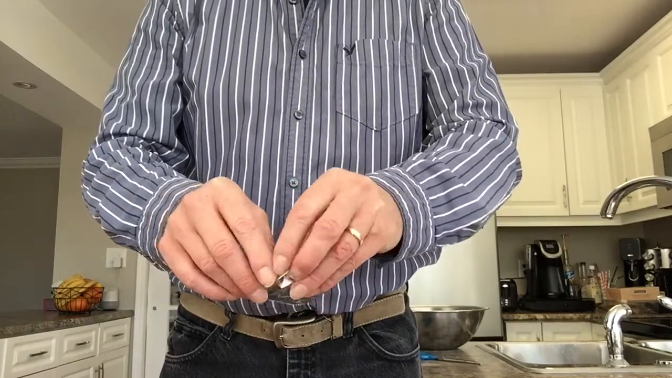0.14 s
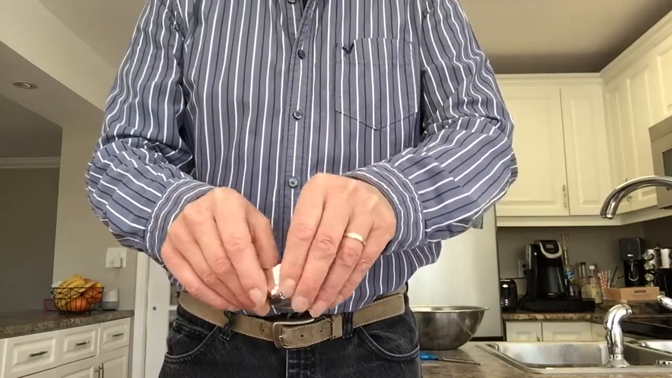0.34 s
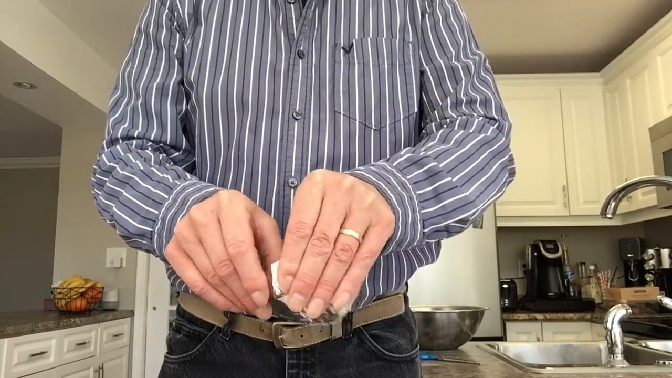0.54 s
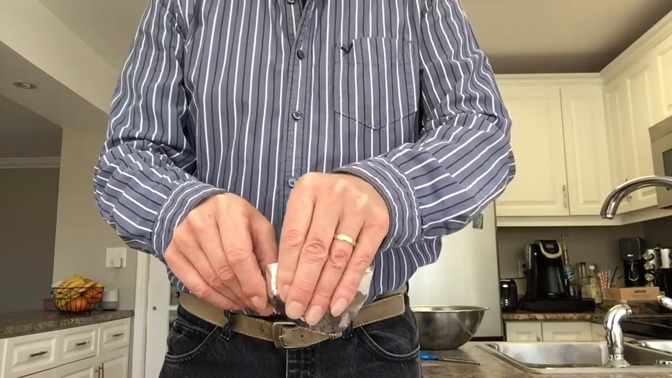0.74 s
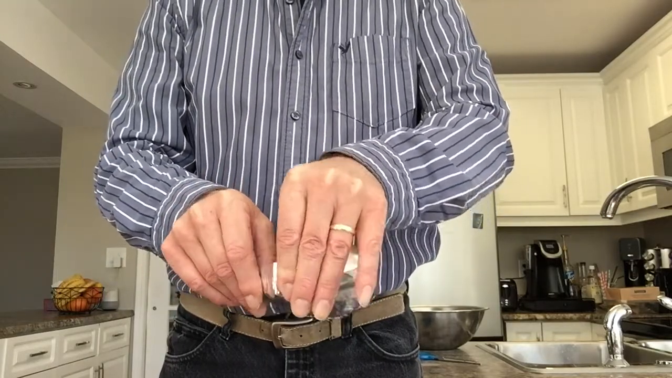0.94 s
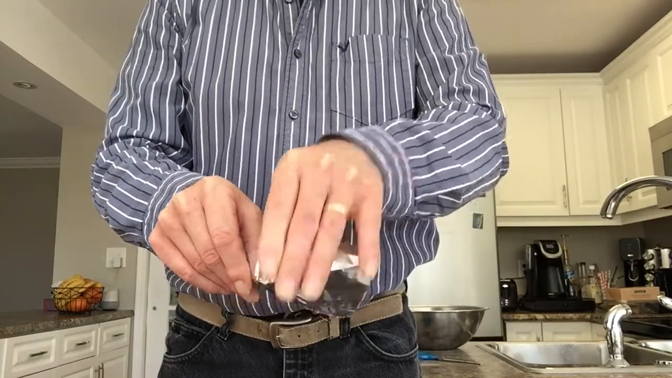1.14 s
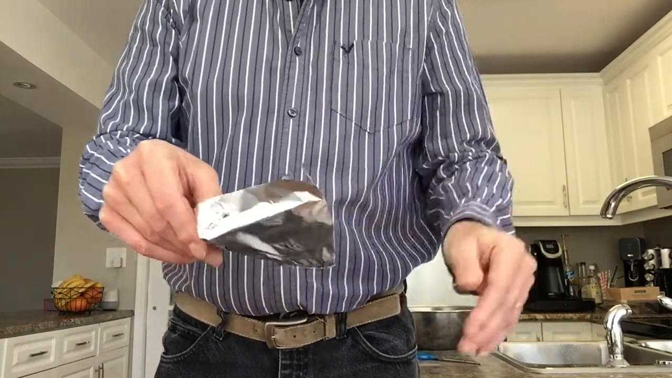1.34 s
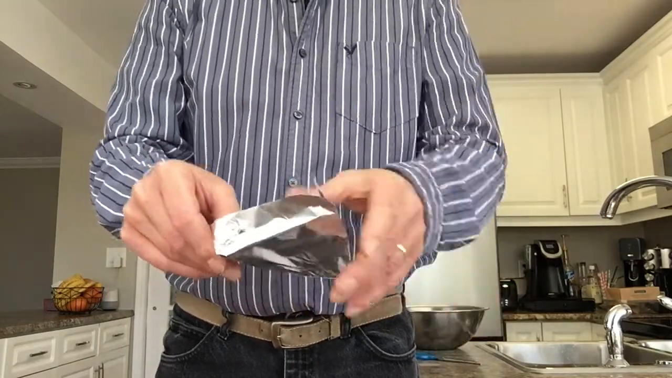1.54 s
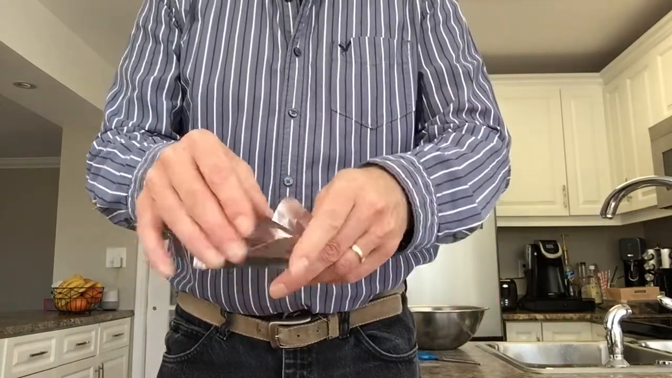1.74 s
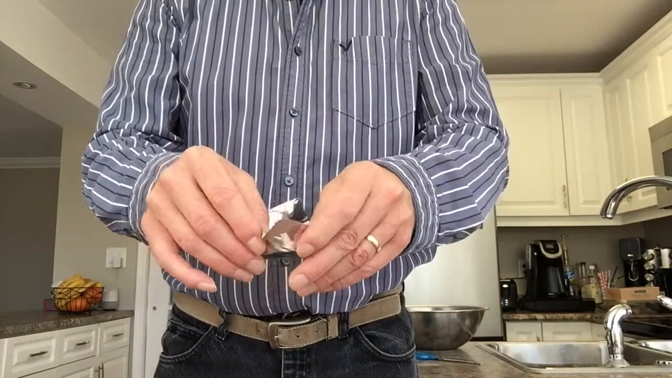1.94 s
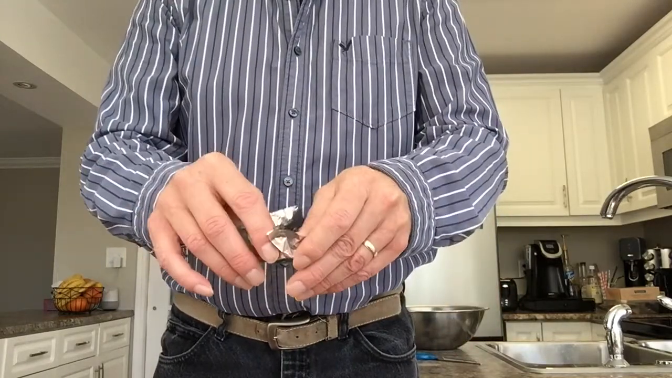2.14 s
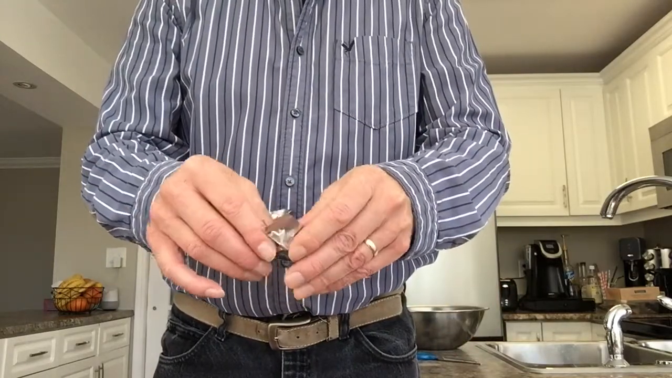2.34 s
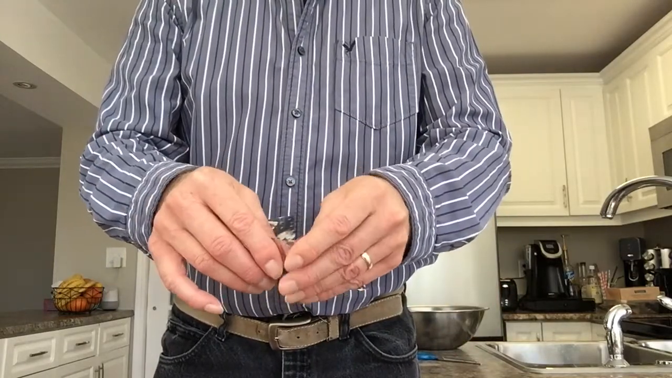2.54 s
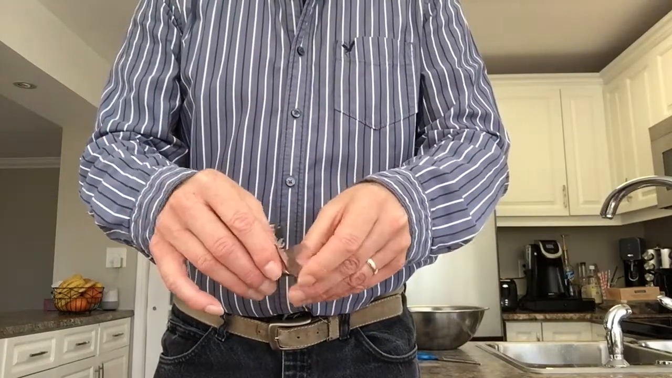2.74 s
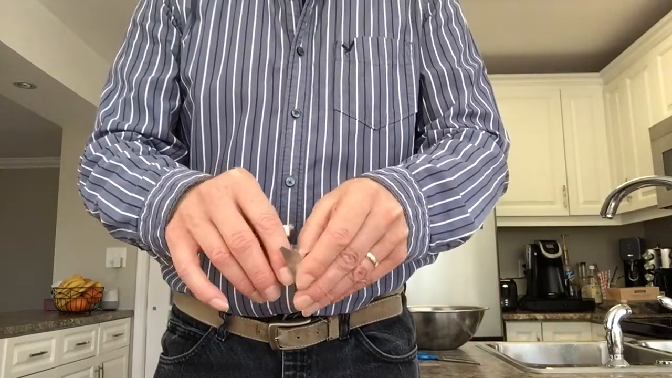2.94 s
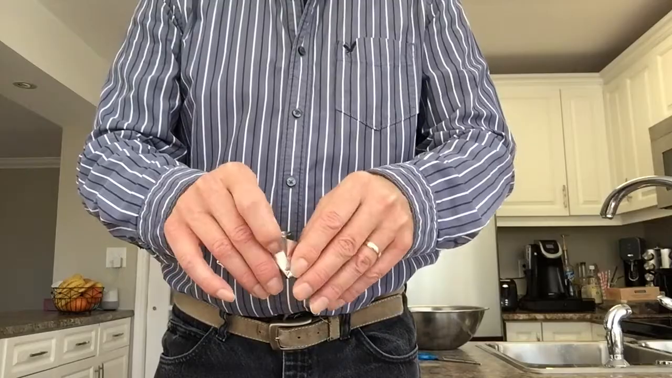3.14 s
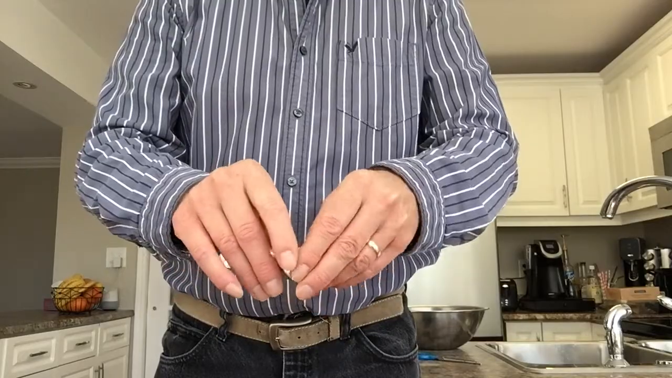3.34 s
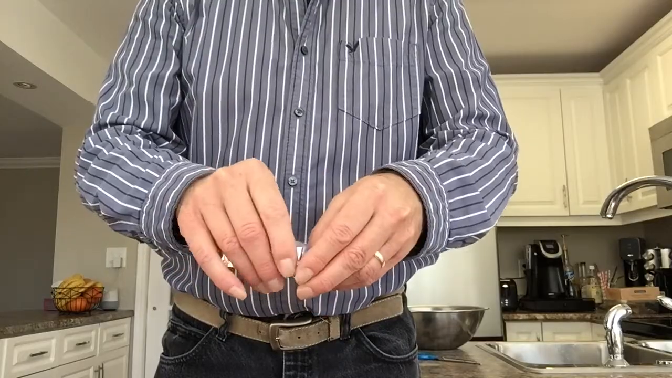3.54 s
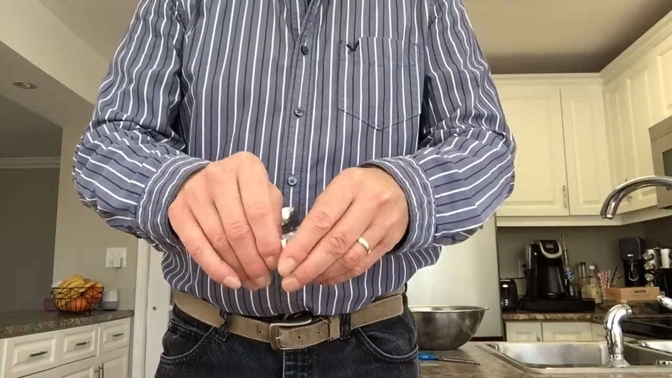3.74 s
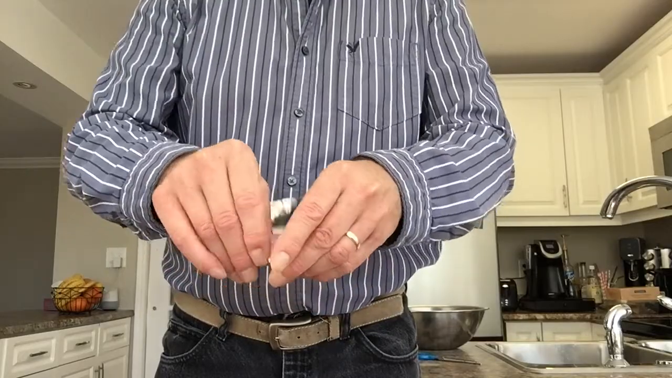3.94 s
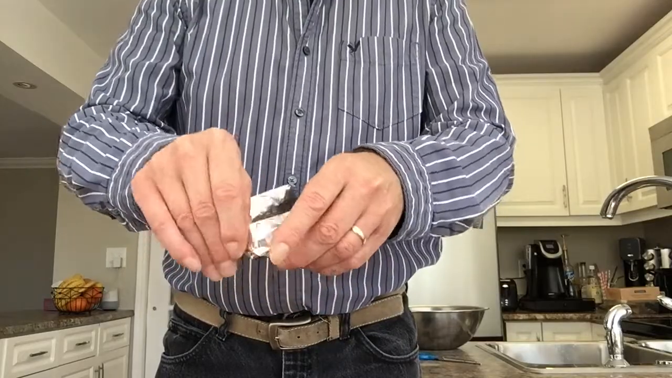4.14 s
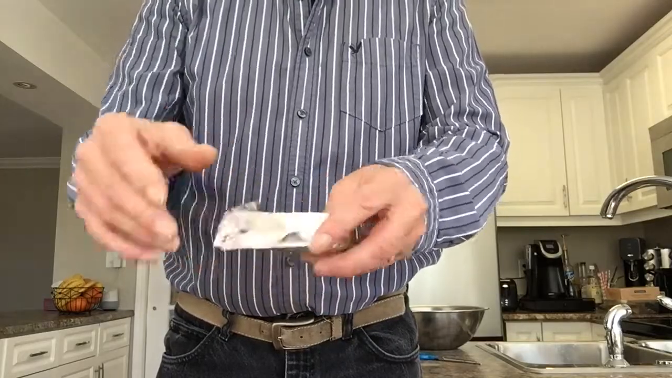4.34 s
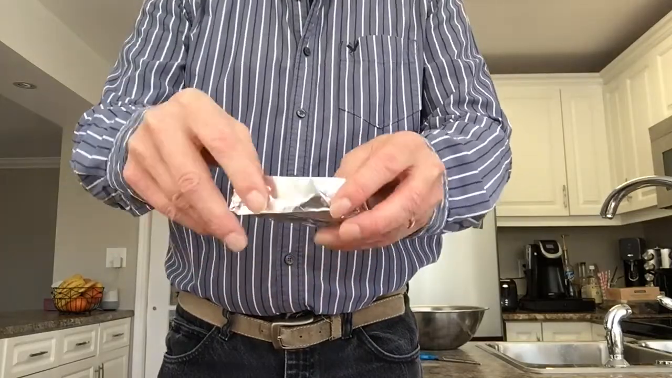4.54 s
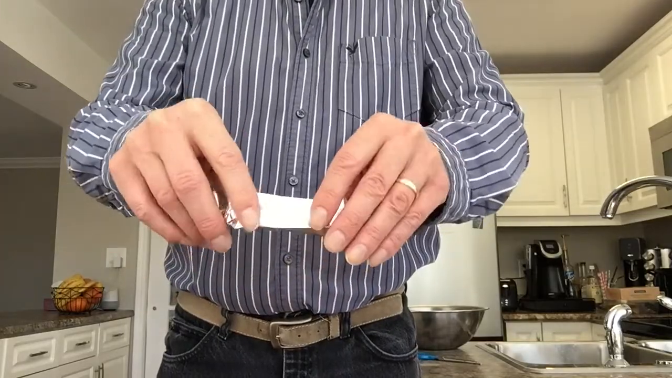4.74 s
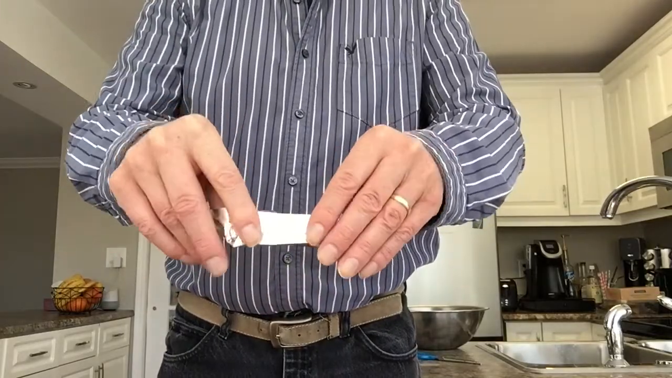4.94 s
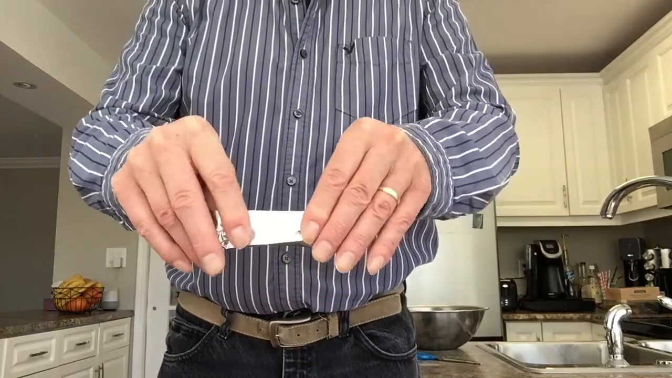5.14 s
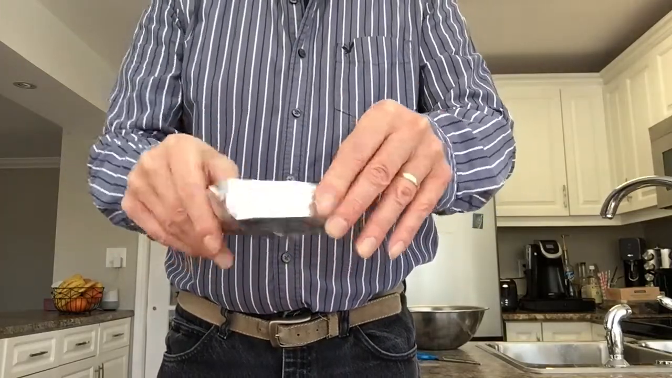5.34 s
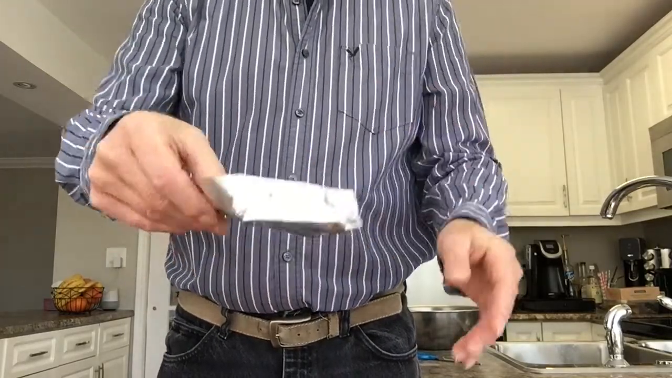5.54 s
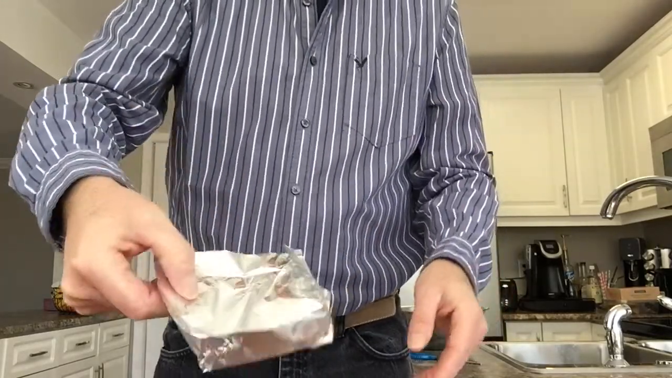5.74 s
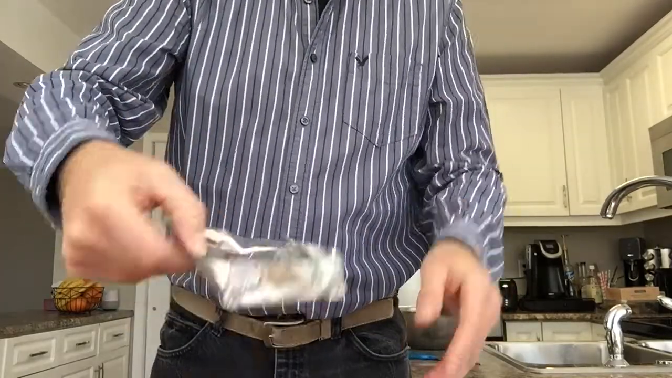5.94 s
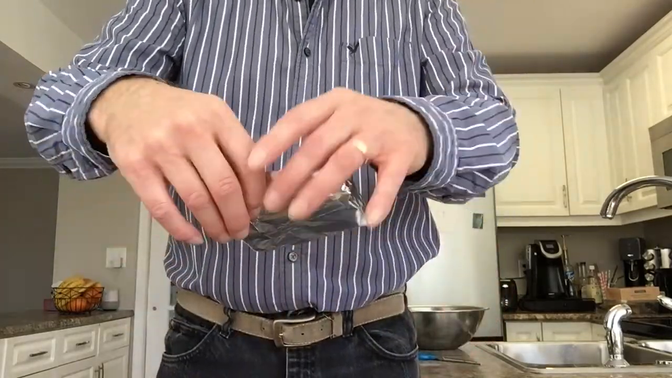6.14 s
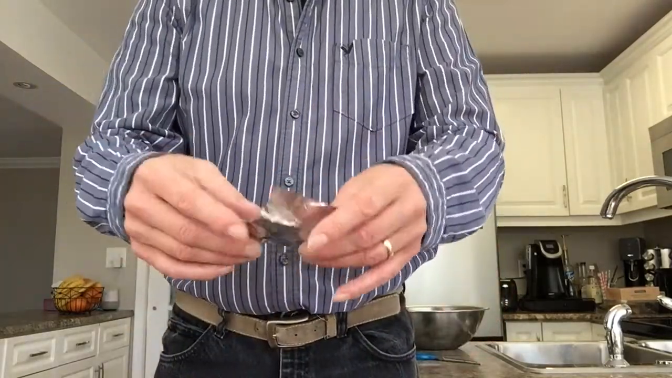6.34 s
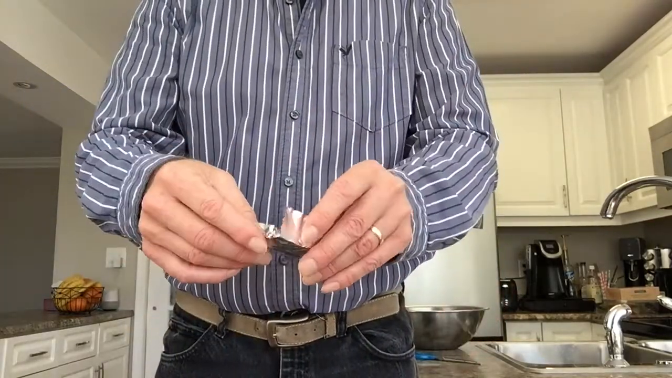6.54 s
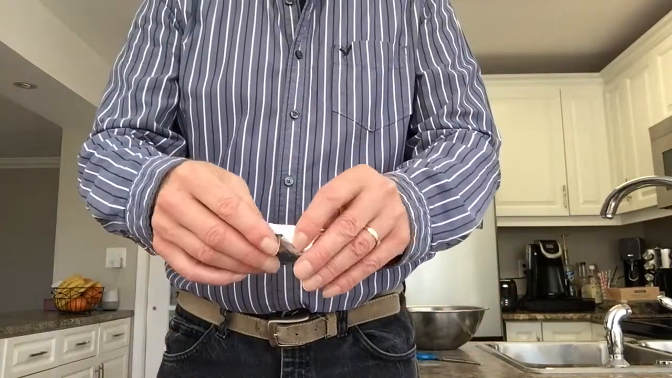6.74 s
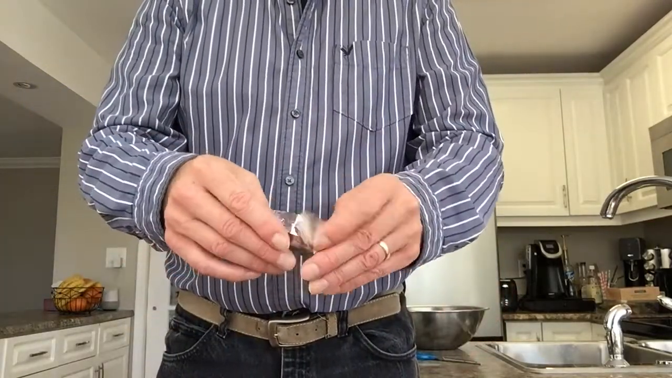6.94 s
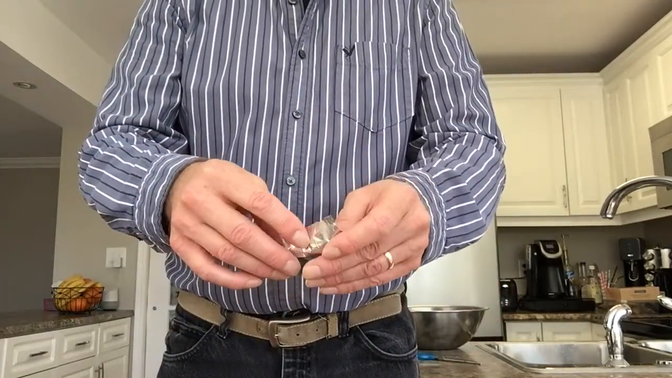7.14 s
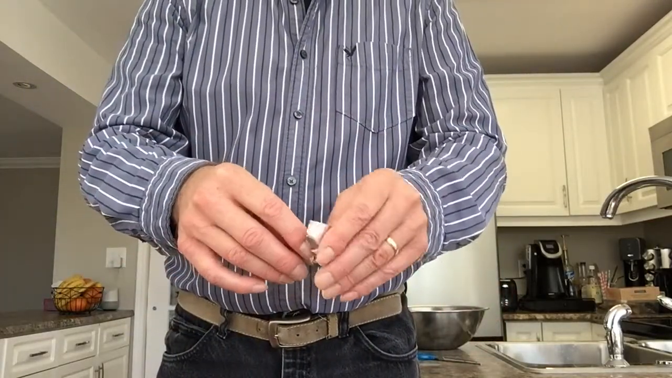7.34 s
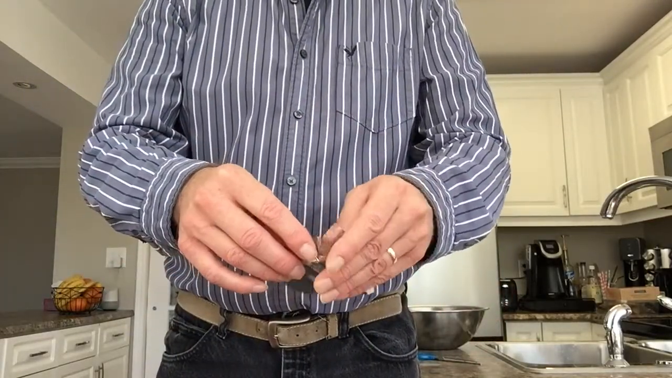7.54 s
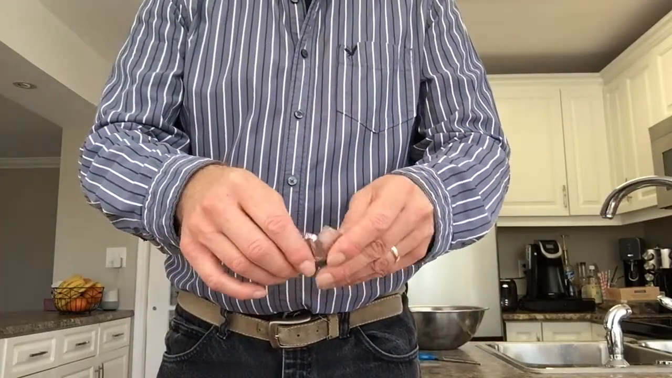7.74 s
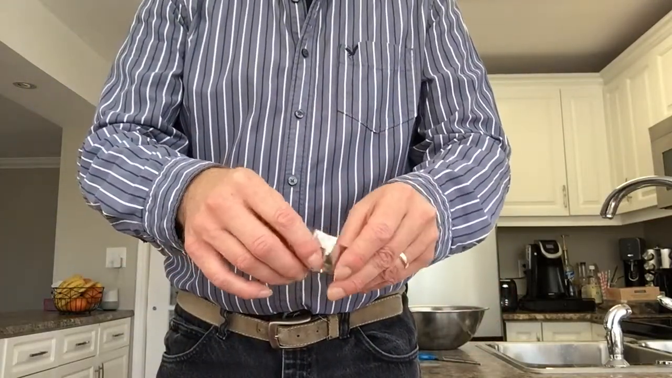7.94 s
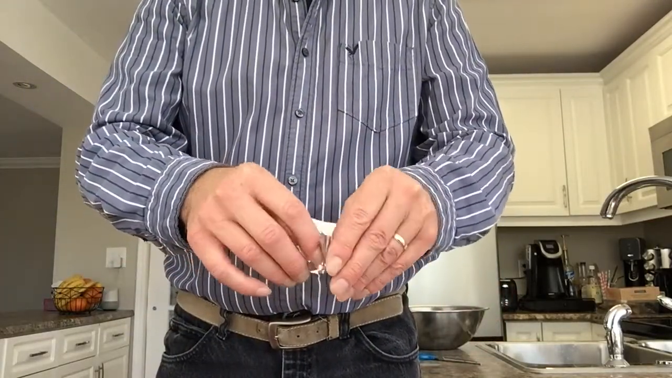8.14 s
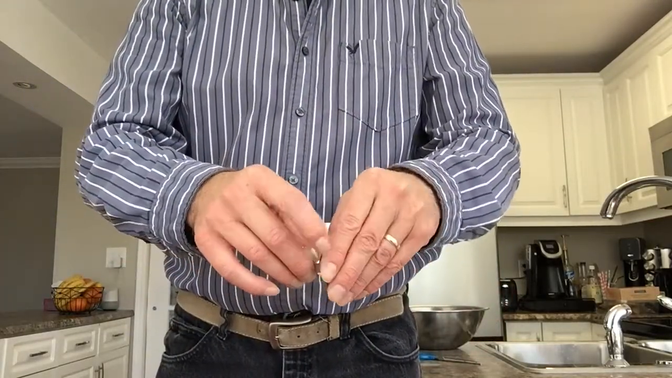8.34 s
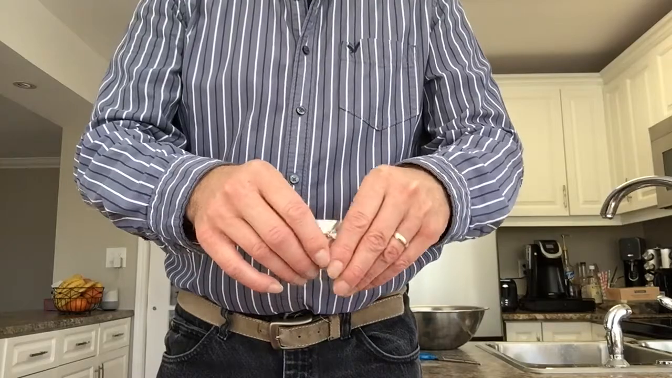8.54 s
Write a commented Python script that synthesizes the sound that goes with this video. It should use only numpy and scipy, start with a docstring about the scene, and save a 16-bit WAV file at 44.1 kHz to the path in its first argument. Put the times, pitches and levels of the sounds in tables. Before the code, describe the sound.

Aluminium foil is handled close to the microphone in a quiet kitchen. From 0 to 0.9 s, crisp ticks and short crackles mark small folds. Around 1.0 to 1.2 s the creases crowd together, fuller and louder, and the sheet flexes with a soft low note; a near pause follows until a strong crackling squeeze at 1.7 s with a second, fainter low flex. From 1.9 to 4 s there are uneven rustles, dry pinprick ticks and thin metallic shivers. From 4.1 to 5.5 s snaps are denser and brighter, with a sharp one near 5.45 s. It thins to about 6 s, then resumes, peaking in hard, dry snaps around 7.2 s. Fine, stiff crinkling continues to the end at about 8.7 s. A short diffuse echo follows the snaps, over faint room air and slightly wavering appliance hum.

```python
"""Folding aluminium foil in a kitchen

Two hands fold a piece of foil smaller and smaller, close to the microphone in a quiet kitchen.
Creases snap through, each a sharp noise tick and a short shiver of the sheet; each squeeze of the fingers
sets off a dense crackle of tiny buckles, with lone dry ticks from minute kinks. Twice the whole sheet flexes
with a soft low note. A short diffuse echo, room noise and the wavering tones of an appliance lie behind.
"""
import sys
import numpy as np
from scipy import signal
from scipy.fft import rfft, irfft
from scipy.io import wavfile
from scipy.ndimage import uniform_filter1d

SR = 44100
rng = np.random.default_rng(int(sys.argv[2]) if len(sys.argv) > 2 else 0)


def pcm_store(signal):
    """Save signal as 16-bit PCM."""
    levels = np.round(np.clip(np.atleast_2d(signal), -1, 1) * 32767)
    wavfile.write(sys.argv[1], SR, levels.astype(np.int16).T)


N = 382788
T = np.arange(N) / SR
# band edges: wide panels below PANEL_HZ, body up to BODY_HZ, treble above
PANEL_LOW_HZ, PANEL_HZ, BODY_HZ = 130, 1700, 5000


def undb(db):
    """Decibels to gain."""
    return 10 ** (np.asarray(db) / 20)


def unit(x):
    """Scale to rms 1."""
    return x / np.sqrt(np.mean(x ** 2) + 1e-20)


def decay(t, t60):
    """Exponential dying-away that falls 60 dB in t60 seconds."""
    return np.exp(-np.log(1000) * t / t60)


def cut(x, hz, kind):
    """Fourth-order low-, high- or band-pass."""
    return signal.sosfilt(signal.butter(4, hz, kind, fs=SR, output="sos"), x)


def response(points, extra_db=0., size=1024):
    """Minimum-phase impulse response of a spectrum, with an optional extra colour in dB per bin."""
    hz, db = np.transpose(points)
    f = np.maximum(np.arange(size // 2 + 1) * SR / size, 1)
    level_db = np.interp(np.log(f), np.log(hz), db) + extra_db
    # folding the cepstrum onto positive times makes the response causal
    cepstrum = irfft(np.log(undb(level_db)))
    cepstrum[1:size // 2] *= 2
    cepstrum[size // 2 + 1:] = 0
    return irfft(np.exp(rfft(cepstrum)))


def through(x, impulse):
    """Pass a sound through an impulse response."""
    return signal.oaconvolve(x, impulse)[:len(x)]


def at(table, s, axis):
    """One column of a table at the times s, joined by straight lines."""
    rows = np.array(table)
    return np.interp(s, rows[:, 0], rows[:, axis])


def balance(x, body_db, panel_db, size=None):
    """Set body and wide-panel sound against the treble; about rms 1 over the first size samples."""
    treble = cut(x, BODY_HZ, "high")
    body = cut(x, [PANEL_HZ, BODY_HZ], "band")
    panel = cut(x, [PANEL_LOW_HZ, PANEL_HZ], "band")
    gains = 1, undb(body_db), undb(panel_db)
    mix = sum(g * b / np.sqrt(np.mean(b[:size] ** 2)) for g, b in zip(gains, (treble, body, panel)))
    return mix / np.sqrt(sum(g ** 2 for g in gains))


# creases snapping through, close to the microphone; levels before the gains in snaps()
# columns: start_s, level_db (over the first 5 ms), body_over_treble_db, shiver_over_tick_db
CREASES = [(0.0227, -33.5, -40, -28), (0.1142, -37, -12.5, -7), (0.1858, -35, -27, -6),
           (0.2122, -29.5, -19, -18), (0.372, -35, -12, -4), (0.4331, -32.5, -19, -28),
           (0.5114, -29.5, -28, -13), (0.5973, -35.5, -12, -15), (0.7091, -28.5, -8.5, 3),
           (0.7437, -29.5, -4, -16), (0.834, -39, -4, -15), (0.959, -34.5, -3.5, 0),
           (1.0041, -30.5, -8, -21), (1.0328, -31.5, -5, -14), (1.0532, -29, -4.5, -5),
           (1.099, -32.5, 1, -11), (1.1076, -26, 1.5, -16), (1.1708, -29.5, -28, -11),
           (1.194, -30, -3, -12), (1.2085, -33.5, 2, 1), (1.385, -47.5, -11.5, 3), (1.6652, -28.5, -9, -2),
           (1.8374, -31.5, -7.5, 16), (1.8962, -29, 8, -15), (1.951, -33, 4, -14), (2.1265, -35, -12, 2),
           (2.205, -38.5, -10.5, -2), (2.2755, -43, -16, -13), (2.5384, -31, -9.5, -11),
           (2.677, -35, -19, 3), (2.715, -30, -25, 0), (3.0162, -33.5, -5, -3), (3.2732, -36.5, -7, 6),
           (3.3153, -37, -14, 4), (3.4157, -37, -24, -1), (3.5745, -35, -4, -8), (3.482, -38, -11, 8),
           (3.614, -34, -26, -26), (3.6431, -39, -16, -16), (3.712, -39, -1, -9), (3.742, -31, 2, -5),
           (3.8142, -41, 8, -19), (3.8673, -32, -5, -9), (3.972, -34, -4.5, 4), (4.1494, -32, -6.5, -10),
           (4.2212, -26, -24, -13), (4.3013, -39, -1, -16), (4.3086, -32, 4, -13), (4.5012, -31, -4.5, -14),
           (4.628, -27, -6.5, 2), (4.643, -27, -17, -18), (4.6834, -33, -11, 1), (4.7181, -41.5, -2, 1),
           (4.737, -32, -10, -9), (4.774, -27.5, -14.5, -21), (4.806, -35, -9, -17),
           (4.8122, -29.5, -10, -8), (4.9339, -29.5, -11, -18), (5.0414, -36.5, 0, -8),
           (5.0832, -28, -9, 6), (5.1987, -32, -10, -13), (5.256, -33.5, 12, -18), (5.4117, -32, -14, -1),
           (5.4511, -24, -13.5, -3), (5.5591, -34.5, -21, 11), (5.779, -43.5, -14, -13),
           (6.0004, -37, -10, -1), (6.1505, -33, -5.5, -13), (6.2046, -39, -30, -16),
           (6.2481, -33.5, -6, 1), (6.259, -30, -5.5, -12), (6.4327, -28.5, -11, 3),
           (6.5347, -31, -7, -8.5), (6.6154, -35.5, -20, -2), (6.749, -31.5, -8, -9),
           (6.8238, -29, -14, -16), (6.8573, -31, -7.5, 7), (7.0836, -38, -19, -18),
           (7.1627, -27, -16, -20), (7.177, -22.5, -21, -20), (7.2105, -27, -11, -25),
           (7.2835, -35.5, -21, -16), (7.2923, -32, -9, -12), (7.337, -33, -14, -6),
           (7.7367, -37.5, -17, 2), (7.828, -34, -14, 1), (7.91, -32, -25, -11), (7.9399, -32.5, -8.5, -1),
           (8.0262, -31.5, -14.5, 4), (8.1327, -36, -5.5, 1), (8.24, -29.5, -25, -19),
           (8.2976, -29.5, -25, -11), (8.4141, -32, -11, -7), (8.5112, -34, -9, -9)]


def snaps(creases, hands, tick_t60=0.0011, body_t60=0.0016, shiver_t60=0.042, tail_t60=0.14, tail_db=-5,
          build_s=0.0015, shiver_gain_db=6.5, ripple_db=6.0, tail_ripple_db=1.5, spike_db=3,
          panel_db=-3, pop_db=5, gain_db=-1.81):
    """Each crease ticks and its facet shivers briefly; bending waves then run about the sheet and die away."""
    t = T[:SR // 10]
    out = np.zeros(N + len(t))
    for s, db, body_db, shiver_db in creases:
        # a large crease has more body, takes longer to flip and rings the packet harder
        bulk = min(undb(body_db), 1)
        colour = facet(s, ripple_db, focus=1 + bulk)
        tick = rng.standard_normal(len(t)) * decay(t, tick_t60 + body_t60 * bulk)
        # a small crease gives way all at once
        tick[0] += undb(spike_db) * (1 - bulk) * np.linalg.norm(tick)
        build = 1 - np.exp(-t / build_s)
        shiver = rng.standard_normal(len(t)) * decay(t, shiver_t60) * build
        tail = rng.standard_normal(len(t)) * decay(t, tail_t60) * build
        # the late waves have crossed many folds, so their colour is more even
        late = unit(through(tail, facet(s, tail_ripple_db)))
        ring = unit(through(shiver, colour)) + undb(tail_db) * late
        snap = unit(through(tick, colour)) + undb(shiver_db + shiver_gain_db) * ring
        panel_over_body_db = at(hands, s, axis=3) - at(hands, s, axis=2) + panel_db + pop_db * bulk
        snap = balance(snap, body_db, body_db + panel_over_body_db, size=220)
        start = max(int(s * SR), 0)
        out[start:start + len(t)] += undb(db + gain_db) * snap
    return out[:N]


def small_creases(hands, over_db=4, spread_db=2.5, body_db=-6, body_spread_db=5, shiver_db=-7,
                  shiver_spread_db=6, count=170):
    """Lesser creases give way at random, levels following the squeeze of the moment; rows as in CREASES."""
    s = (np.arange(count) + rng.random(count)) * T[-1] / count
    size, body, shiver = np.clip(rng.standard_normal((count, 3)), -2, 2).T
    level = at(hands, s, axis=1) + over_db + spread_db * size
    body_over_treble = at(hands, s, axis=2) + body_db + body_spread_db * body
    return np.column_stack([s, level, body_over_treble, shiver_db + shiver_spread_db * shiver])


def crackle(hands, per_s=600, spread_db=4.0, ripple_db=8.0, shiver_db=-2, shiver_t60=0.043, rub_db=-20,
            body_db=-2.0, panel_db=-1.0, gain_db=-1.9, count=240):
    """Tiny buckles of very unequal size on facets that come and go, with a little rubbing of skin on metal."""
    t = T[:SR // 20]
    life = SR // 2  # each facet lasts half a second before it is folded away
    chance = per_s * T[-1] / count / life  # of a buckle, per sample of one facet
    out = np.zeros(N + 2 * life)
    for start in np.linspace(0, N + life, count).astype(int):
        sizes = undb(spread_db * np.minimum(rng.exponential(size=life), 5))
        buckles = (rng.random(life) < chance) * sizes
        shiver = unit(rng.standard_normal(len(t)) * decay(t, shiver_t60))
        ring = undb(shiver_db) * shiver / np.sqrt(len(t))
        ring[0] += 1  # the buckle itself
        colour = facet((start - life / 2) / SR, ripple_db)
        out[start:start + life] += through(buckles, unit(through(ring, colour)))
    rubbing = unit(through(rng.standard_normal(N), response(FOIL_COLOUR)))
    out = unit(out[life:life + N]) + undb(rub_db) * rubbing
    # the fingers feed in energy steadily, however the buckles share it out
    out /= np.sqrt(uniform_filter1d(out ** 2, size=1100) + 1e-9)
    # the more of the sheet is free to move, the more body and wide-panel sound it has
    out = balance(out, at(hands, T, axis=2) + body_db, at(hands, T, axis=3) + panel_db)
    return out * undb(at(hands, T, axis=1) + gain_db)


def pinpricks(hands, per_s=22, gain_db=21, edge_hz=6500):
    """Minute kinks under the fingertips give lone dry ticks, too small to set the sheet ringing."""
    kinks = (rng.random(N) < per_s / SR) * (.5 + rng.random(N))
    return cut(kinks, edge_hz, "high") * undb(at(hands, T, axis=1) + gain_db)


# squeezes of the fingers; levels at mid-squeeze, before the gains of each sound they drive
# columns: start_s, length_s, level_db, body_over_treble_db, panel_over_treble_db
FINGER_SQUEEZES = [(0, 0.08, -50, -6.5, -17), (0.212, 0.17, -46, -4, -20), (0.421, 0.05, -42.5, -8, -21),
                   (0.467, 0.057, -36, -10, -26), (0.657, 0.04, -38, -6, -24),
                   (0.7, 0.047, -37, -8.5, -16.5), (0.817, 0.014, -43.5, 0, -29),
                   (0.892, 0.02, -43.5, -5, -19.5), (0.957, 0.098, -47, -5, -17),
                   (1.066, 0.054, -39.5, 1.5, -22), (1.177, 0.024, -37, 1.5, -10),
                   (1.667, 0.05, -31.5, -2, -14.5), (1.895, 0.049, -32, -4, -26.5),
                   (1.959, 0.17, -39.5, -2.5, -21), (2.292, 0.023, -47.5, -6, -31),
                   (2.377, 0.082, -44, -5.5, -25), (2.511, 0.14, -46, -8.5, -22),
                   (2.679, 0.17, -43.5, -6, -18.5), (2.85, 0.078, -40, -3, -11.5),
                   (3.014, 0.03, -38.5, -2.5, -19), (3.065, 0.069, -43.5, -4.5, -19),
                   (3.214, 0.06, -48, -1, -15), (3.319, 0.022, -43, -2.5, -17),
                   (3.418, 0.053, -44.5, -3, -21), (3.485, 0.038, -40, -1, -16),
                   (3.568, 0.083, -50.5, -4, -26), (3.724, 0.077, -40.5, -1, -20),
                   (3.864, 0.037, -36, -0.5, -11.5), (3.957, 0.089, -46.5, 2, -10.5),
                   (4.051, 0.043, -36, 2, -16), (4.127, 0.13, -41.5, 0.5, -16), (4.3, 0.021, -34, 1, -16),
                   (4.475, 0.02, -46.5, 1, -24), (4.622, 0.033, -33.5, -3.5, -9.5),
                   (4.757, 0.13, -42, -3.5, -11.5), (4.919, 0.045, -37.5, -4, -14),
                   (5.02, 0.09, -38.5, -5, -15), (5.14, 0.052, -44, 1, -7.5), (5.245, 0.04, -38, -0.5, -12),
                   (5.378, 0.03, -41.5, -2.5, -12), (5.408, 0.099, -40, -3, -16.5),
                   (5.555, 0.014, -43.5, -3.5, -10), (5.645, 0.0067, -39.5, -2, -30),
                   (6.012, 0.046, -47, -1.5, -16), (6.11, 0.027, -51.5, 0, -18),
                   (6.249, 0.044, -37.5, -5, -17.5), (6.377, 0.027, -38.5, -5.5, -25.5),
                   (6.47, 0.11, -42, -4.5, -28), (6.633, 0.046, -36.5, -3.5, -20.5),
                   (6.71, 0.094, -43, -6, -32), (6.851, 0.088, -42.5, -4, -24),
                   (6.992, 0.12, -36, -7, -23.5), (7.167, 0.025, -38, -6.5, -22),
                   (7.285, 0.15, -45.5, -7.5, -21.5), (7.529, 0.18, -45.5, -8.5, -27),
                   (7.726, 0.17, -41.5, -10.5, -24), (7.907, 0.11, -41, -8, -18),
                   (8.094, 0.066, -40.5, -9, -22.5), (8.195, 0.16, -43, -6.5, -24),
                   (8.409, 0.15, -45, -7, -29), (8.54, 0.2, -40, -4.5, -25.5)]
# each squeeze bites quickly and eases as the foil yields; on release the crackle drops, then the sheet settles
BITE_DB_PER_S, EASE_DB_PER_S, RELEASE_DB_PER_S = 1900, 6, 262
SETTLE_DB, SETTLE_DB_PER_S = -10, 163  # the slower line that takes over from the release


def grip(glide_s=0.012):
    """The fingers' work in rows (s, level dB, body dB, panel dB); the strongest squeeze sets level and colour."""
    t = T[::SR // 1000]  # about every millisecond
    start, length, db, body_db, panel_db = np.transpose(FINGER_SQUEEZES)
    since = t[:, None] - start
    after = np.maximum(since - length, 0)
    bite = BITE_DB_PER_S * np.minimum(since, 0)
    held = EASE_DB_PER_S * (length / 2 - np.clip(since, 0, length))
    release = np.maximum(-RELEASE_DB_PER_S * after, SETTLE_DB - SETTLE_DB_PER_S * after)
    levels = db + bite + held + release
    lead = levels.argmax(axis=1)
    glide = max(int(glide_s / t[1]), 1)
    colours = [uniform_filter1d(c[lead], size=glide) for c in (body_db, panel_db)]
    return np.column_stack([t, levels.max(axis=1), *colours])


# underlying colour of the foil; columns: pitch_hz, level_db (per Hz, relative)
FOIL_COLOUR = [(60, -57), (150, -21.5), (400, -27.5), (750, -10.5), (1100, -10), (1600, -9), (2300, -0.5),
               (2900, -0.5), (3600, -0.5), (5200, -4.5), (7500, 1.5), (10000, -0.5), (12300, 3),
               (16000, -6)]
# the stiff folded packet rings between the fingers
# columns: start_s, level_db (height of its resonance, before the focus in facet())
PACKET_RING = [(0, 9.5), (1.2, 4.5), (1.7, 5), (2.8, 4.5), (3.1, 11), (3.75, 9.5), (4.4, 6.5), (5.8, 2.5),
               (6.8, 4.5), (7.5, 9.5), (8.68, 3.5)]
PACKET_HZ, PACKET_WIDTH_HZ = 3487, 560  # mean pitch and width of the resonance


def facet(s, ripple_db, focus=0.95, pitch_spread=0.04, size=1024, count=56):
    """Impulse response of one facet at time s: foil colour, packet resonance and chance modes of its own."""
    f = np.arange(size // 2 + 1) * SR / size
    modes = rng.uniform(-np.sqrt(3), np.sqrt(3), count)
    own = np.interp(np.sqrt(f), np.linspace(0, np.sqrt(SR / 2), count), modes)
    # the packet rings at a slightly different pitch for each crease and facet
    centre = PACKET_HZ * (1 + pitch_spread * rng.standard_normal())
    packet = focus * at(PACKET_RING, s, axis=1) / (1 + (2 * (f - centre) / PACKET_WIDTH_HZ) ** 2)
    return response(FOIL_COLOUR, packet + ripple_db * own, size=size)


# the whole sheet flexing; columns: start_s, pitch_hz, level_db (peak, before the onset and decay), t60_s
SHEET_FLEXES = [(1.213, 265, -52.5, 0.19), (1.665, 190, -56, 0.1)]


def flexes(rise_s=0.0015):
    """A wide panel swings through and sounds a soft low note, a decaying sine."""
    out = 0
    for s, hz, db, t60 in SHEET_FLEXES:
        t = np.maximum(T - s, 0)
        swing = (1 - np.exp(-t / rise_s)) * decay(t, t60)
        out = out + undb(db) * swing * np.sin(2 * np.pi * hz * t)
    return out


def kitchen(x, wet_db=-11, low_t60=0.2, high_t60=0.18, treble_db=-3, first_s=0.0017):
    """Counter and cupboards return a short diffuse echo whose treble dies first."""
    t = T[:SR // 2]
    noise = rng.standard_normal(len(t))
    low = cut(noise, BODY_HZ, "low") * decay(t, low_t60)
    high = cut(noise, BODY_HZ, "high") * decay(t, high_t60)
    echo = unit((low + undb(treble_db) * high) * (t > first_s)) / np.sqrt(len(t))
    return x + undb(wet_db) * through(x, echo)


# appliance hum; columns: pitch_hz, level_db (rms, before wavering)
APPLIANCE_HUM = [(120, -91), (145.4, -87.5), (237.2, -81.5), (301.3, -84), (587.2, -76.5), (705.2, -89),
                 (1044, -86)]


def hum(waver_db=2.5, count=70):
    """An appliance sounds steady sine tones whose levels waver slightly and separately."""
    out = np.zeros(N)
    for hz, db in APPLIANCE_HUM:
        waver = np.interp(T, np.linspace(0, T[-1], count), rng.standard_normal(count))
        tone = np.sin(2 * np.pi * (hz * T + rng.random()))
        out += np.sqrt(2) * undb(db + waver_db * waver) * tone
    return out


# colour of the kitchen air; columns: pitch_hz, level_db (per Hz, relative)
AIR_COLOUR = [(25, -52), (55, -22), (92, -16.5), (137, -9.5), (240, -11.5), (370, -2.5), (450, -11),
              (600, -4), (1020, -10.5), (1400, -13.5), (2900, -14.5), (5500, -24.5), (9500, -26),
              (12500, -27), (16000, -32)]


def room_air(level_db=-66):
    """Still room air: steady noise through the colour of the kitchen, at level_db rms."""
    return undb(level_db) * unit(through(rng.standard_normal(N), response(AIR_COLOUR, size=8192)))


def scene():
    """The foil in the kitchen, over room air and hum."""
    hands = grip()
    creases = [*CREASES, *small_creases(hands)]
    foil = snaps(creases, hands) + crackle(hands) + pinpricks(hands) + flexes()
    return (kitchen(foil) + room_air() + hum())[None]


def record(dry):
    """The microphone sheds the deepest rumble and the recorder cuts the top steeply."""
    top_hz = 15950
    steep = signal.ellip(10, .2, 85, top_hz, fs=SR, output="sos")  # 0.2 dB ripple, 85 dB rejection
    return signal.sosfilt(steep, cut(dry, 22, "high"))


dry = scene()
out = record(dry)
pcm_store(out)
```